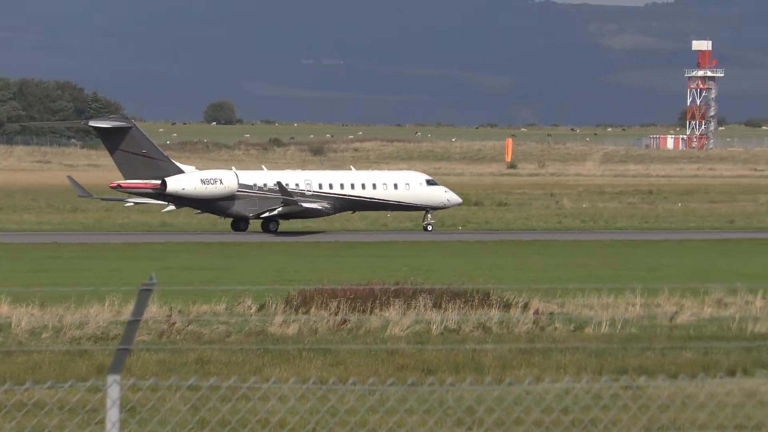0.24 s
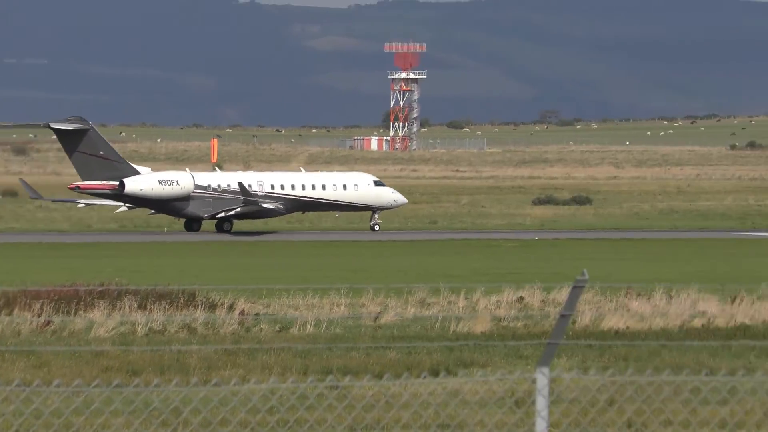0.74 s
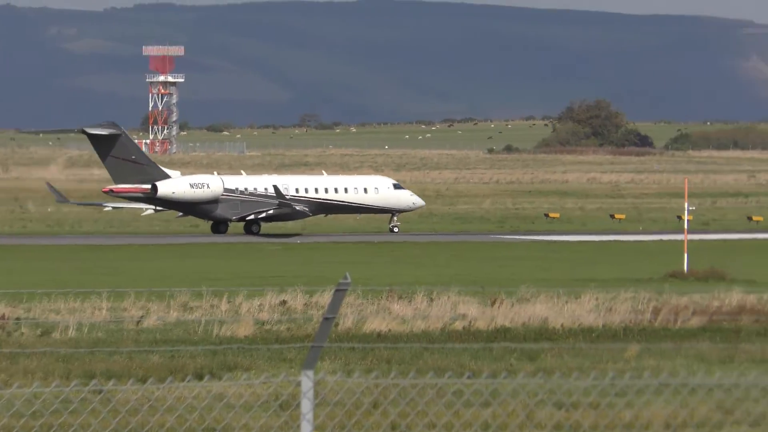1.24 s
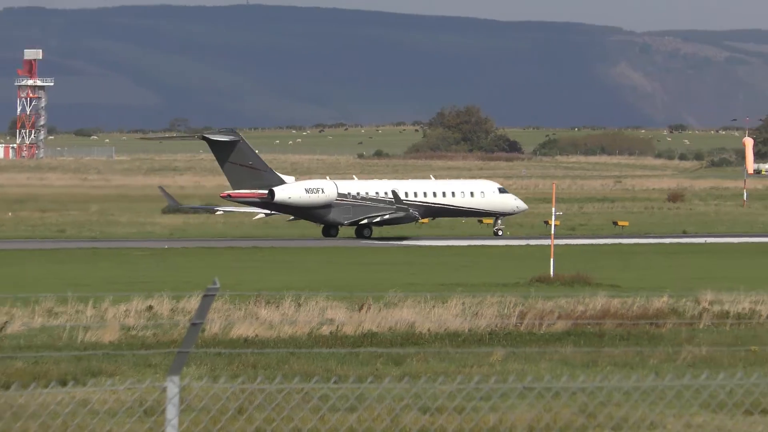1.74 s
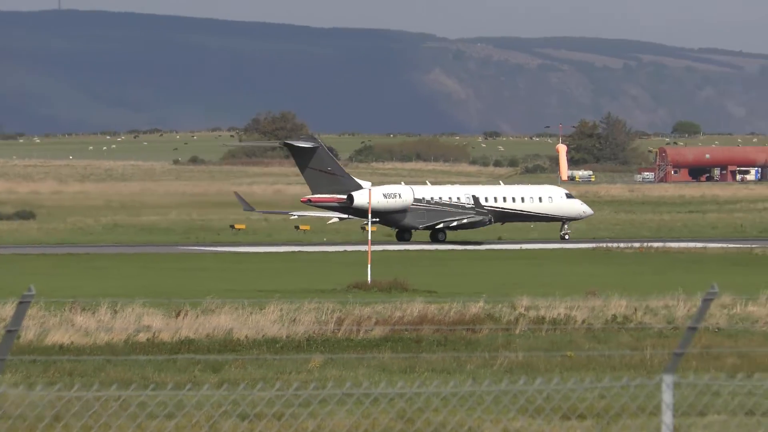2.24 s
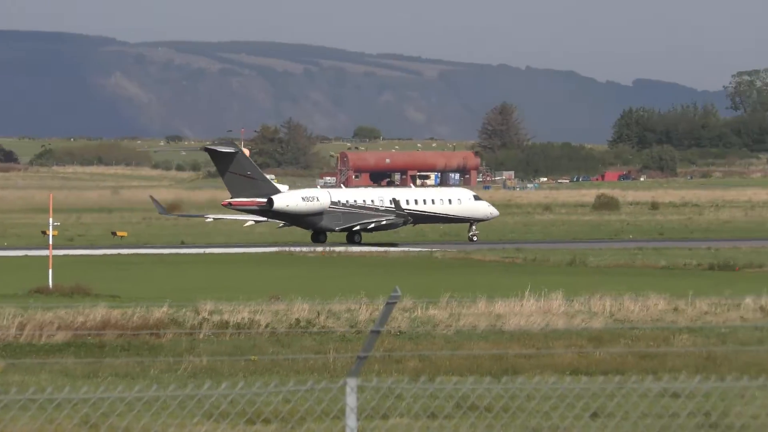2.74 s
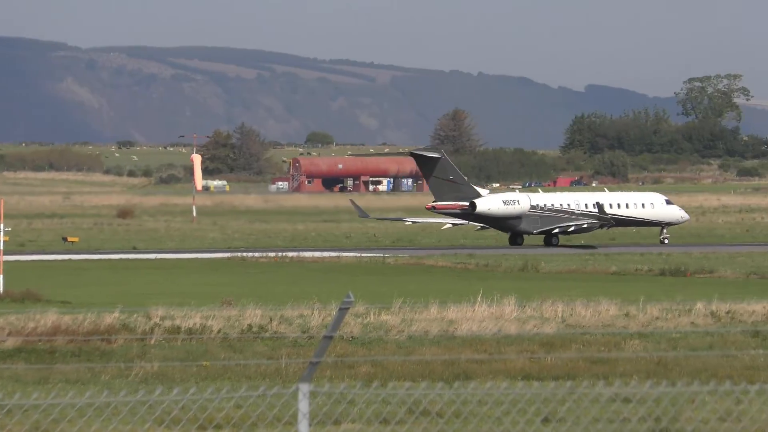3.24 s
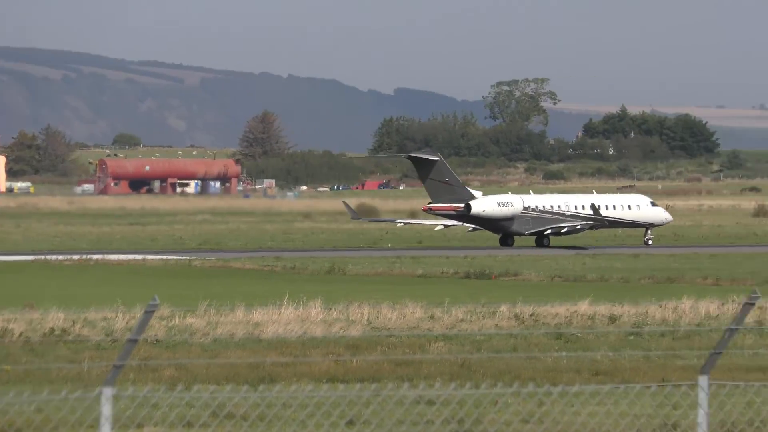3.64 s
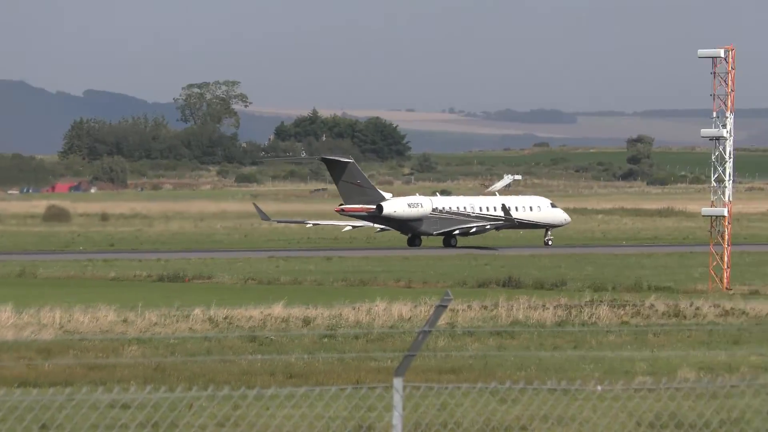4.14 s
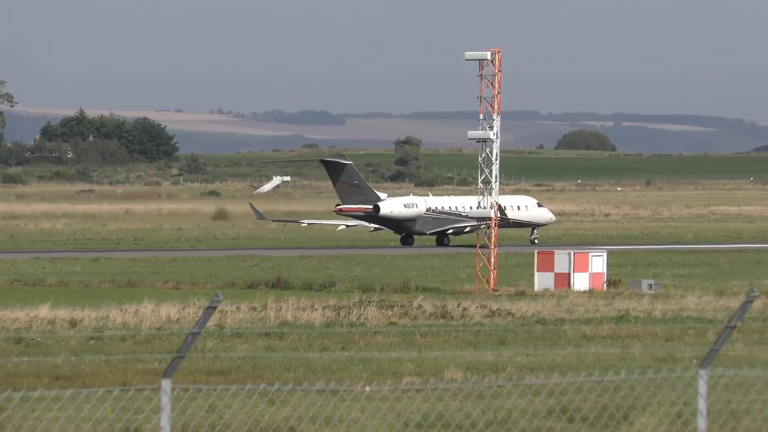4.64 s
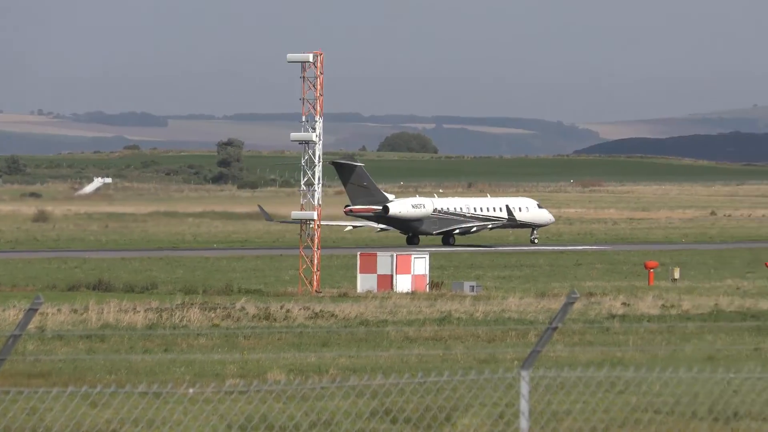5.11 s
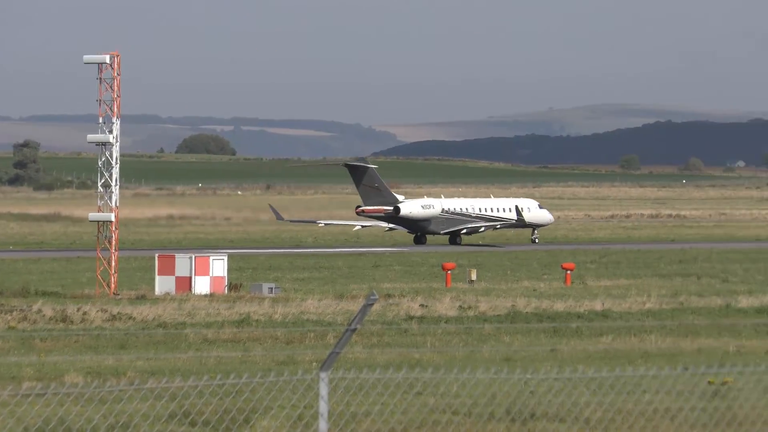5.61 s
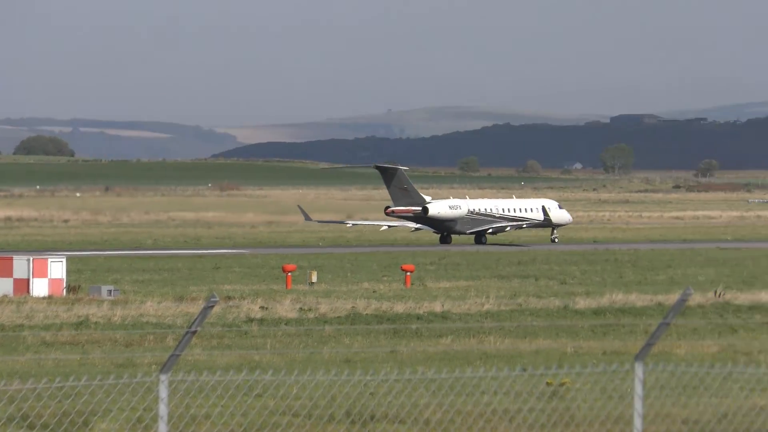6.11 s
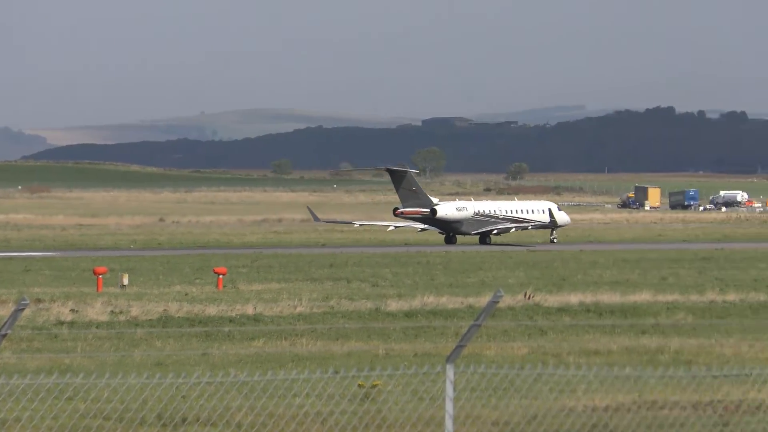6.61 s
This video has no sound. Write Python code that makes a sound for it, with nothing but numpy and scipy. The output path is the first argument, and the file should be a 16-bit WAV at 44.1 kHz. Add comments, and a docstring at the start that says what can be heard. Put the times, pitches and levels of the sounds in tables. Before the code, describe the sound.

A steady, dull jet roar heard from far across an open airfield, mono. The opening is strong and a bit crunchy from overload; around two seconds it falls back, then surges near three and again more weakly past five and a half. A faint high whine slowly sinks and disappears into the rush, while deep wind buffeting becomes more noticeable toward the end.

```python
"""Exhaust roar, fan rush and a thin whine swell and fade on the wind, over a low rumble.
They come from a twin-engine business jet on a runway, dulled by a wide stretch of grass.
Roar, rush and rumble are random noise shaped by frequency; the whine is one wavering tone.
The loudest stretches overload the input, and gusts on the microphone add a low flutter."""
import sys
import numpy as np
from scipy import signal
from scipy.fft import rfft, irfft, next_fast_len
from scipy.io import wavfile
from scipy.ndimage import uniform_filter1d

SR = 44100
rng = np.random.default_rng(int(sys.argv[2]) if len(sys.argv) > 2 else 0)


def unload_wav(signal):
    """Save mono or channel-first audio to the path in sys.argv[1] as 16-bit WAV at rate SR, clipped to [-1, 1]."""
    wavfile.write(
        sys.argv[1],
        SR,
        np.round(np.clip(np.atleast_2d(signal).T, -1, 1) * 32767).astype(np.int16),
    )


N = 302526
TIME = np.arange(N) / SR  # seconds
FREQS = np.maximum(np.arange(N // 2 + 1) * SR / N, 1)  # Hz, kept above zero for the logarithm


def engines(shimmer_hz=6, shimmer_db=0.6):
    """Exhaust mixing and fan noise; eddies along the path make the higher parts shimmer."""
    # Tone colour of each noise: (frequency [Hz], relative level [dB per Hz])
    rumble_spectrum = [(60, -26.5), (130, -12.5), (180, -14.5), (260, -6), (380, -1), (480, -2.5),
                       (620, -6), (1000, -32)]
    roar_spectrum = [(280, -31.5), (420, -11), (560, -4), (820, 0.5), (1100, -0.5), (1420, 0), (1700, -2),
                     (2100, -20.5), (3000, -42.5)]
    fan_spectrum = [(1000, -25.5), (1450, -7), (1800, -0.5), (2200, 2), (2600, 1.5), (2800, -2.5),
                    (3100, -10.5), (3400, -12.5), (3650, -17), (4600, -21.5), (5500, -29.5), (6700, -42),
                    (8500, -55.5), (12000, -76.5)]
    # Loudness of the low rumble: (time [s], level [dB])
    rumble_level = [(0, -26.5), (1.25, -21.5), (1.8, -25.5), (2.35, -22.5), (2.9, -27), (3.6, -24),
                    (4.2, -28.5), (4.6, -26.5), (5.05, -30.5), (6.86, -30.5)]

    rumble_db, = in_time(rumble_level)
    roar_db, fan_db = engine_levels()
    rumble = from_db(rumble_db) * turbulence(rumble_spectrum)
    roar = from_db(roar_db) * turbulence(roar_spectrum)
    fan = from_db(fan_db) * turbulence(fan_spectrum)
    # roar and fan shimmer independently
    roar = roar * from_db(shimmer_db * drift(shimmer_hz))
    fan = fan * from_db(shimmer_db * drift(shimmer_hz))
    return rumble + roar + fan


def engine_levels():
    """Roar and fan rush in dB: both fade as the jet rolls away and ride swells on the wind."""
    # Swells and lulls carried by the wind:
    # (time [s], half length [s], exhaust roar change [dB], fan rush change [dB])
    swells = [(0.12, 0.089, 0, 3.5), (0.492, 0.12, 2, 4.5), (1.086, 0.12, 3.5, -3), (1.368, 0.2, 4, 4),
              (1.85, 0.091, 2.5, 1.5), (2.564, 0.088, 0.5, 6), (2.726, 0.14, -5.5, 0.5),
              (3.137, 0.35, 4.5, 7), (3.78, 0.17, -3.5, -3), (4.118, 0.17, -2, 1.5), (4.62, 0.21, 2, 3.5),
              (5.613, .18, 9, 7.5), (5.993, .11, -0.5, 4), (6.403, .15, 0.5, -3)]
    roar_start_db, roar_fade_db_per_s = -21.5, 0.6
    fan_start_db, fan_fade_db_per_s = -23, 0.37
    # both begin louder, hold, then drop away
    extra_db, hold_s, release_s = 9.5, 1.57, 0.65

    loud_db = extra_db * np.clip(1 - (TIME - hold_s) / release_s, 0, 1)
    roar_db = roar_start_db - roar_fade_db_per_s * TIME + loud_db
    fan_db = fan_start_db - fan_fade_db_per_s * TIME + loud_db
    for s, length, roar_change_db, fan_change_db in swells:
        shape = swell(s, length)
        roar_db = roar_db + roar_change_db * shape
        fan_db = fan_db + fan_change_db * shape
    return roar_db, fan_db


def whine():
    """The fan blade tone sinks as the jet goes by; moving air blurs its pitch and level."""
    start_hz, sag_hz_per_s = 2587, 24
    under_fan_db, fade_db_per_s = 10, 1.3  # starts this far below the fan rush, then sinks further
    _, fan_db = engine_levels()
    level_db = fan_db - under_fan_db - fade_db_per_s * TIME
    pitch_hz = start_hz - sag_hz_per_s * TIME
    waver_hz = 8 * drift(rate_hz=25)
    flicker_db = 3.5 * drift(rate_hz=14)
    # adding up the pitch, sample by sample, gives the phase of the tone
    phase = 2 * np.pi * np.cumsum(pitch_hz + waver_hz) / SR
    tone = rms_one(np.sin(phase) * from_db(flicker_db))
    return from_db(level_db) * tone


def over_grass(x):
    """Direct and ground-reflected sound interfere: bass comes and goes, hollows colour the roar."""
    # Boost or cut of the bass: (time [s], level [dB])
    bass_level = [(0, 1), (1.3, -3), (1.9, -2.5), (3.5, 0), (4.3, 10.5), (5.2, 3.5), (5.7, -4), (6.1, -3),
                  (6.7, 9.5)]
    # Bands hollowed out for a moment: (time [s], centre frequency [Hz], level change [dB])
    hollows = [(3.05, 606, -5.5), (3.8, 1310, -2), (4.27, 560, -7), (4.55, 1140, -7), (5.7, 254, -11),
               (6.35, 825, -5), (6.75, 666, -4)]
    bass_hz, bass_octaves = 190, 0.47
    hollow_s, hollow_octaves = 0.29, 0.33  # half length and half width

    bass_db, = in_time(bass_level)
    # adding a band times (gain - 1) raises or lowers just that band
    out = x + band(x, bass_hz, bass_octaves) * (from_db(bass_db) - 1)
    for s, hz, db in hollows:
        gain = from_db(db * swell(s, hollow_s))
        out = out + band(x, hz, hollow_octaves) * (gain - 1)
    return out


def wind(steadiness=0.76):
    """Eddies buffet the microphone; the wind freshens steadily, with gusts and lulls."""
    # Tone colour of the buffeting: (frequency [Hz], relative level [dB per Hz])
    buffet_spectrum = [(12, -38), (24, -8.5), (36, -7), (48, -2.5), (62, -1.5), (78, -1.5), (92, -11),
                       (110, -20), (160, -30), (240, -17.5), (400, -40), (800, -81)]
    # Gusts and lulls: (time [s], half length [s], level change [dB])
    gusts = [(2.337, .35, -1), (4.252, 0.35, 6), (4.433, 0.021, 5), (5.356, 0.12, 8), (5.823, 0.12, -3),
             (6.01, 0.067, 1), (6.7, 0.18, 2.5)]
    start_db, rise_db_per_s = -31.5, 1.38

    level_db = start_db + rise_db_per_s * TIME
    for s, length, db in gusts:
        level_db = level_db + db * swell(s, length)
    eddies = turbulence(buffet_spectrum)
    # even out most of the random swings in strength, using a window of 1/7 s
    strength = np.sqrt(uniform_filter1d(eddies ** 2, size=SR // 7))
    return from_db(level_db) * rms_one(eddies / strength ** steadiness)


def turbulence(spectrum):
    """Random pressure, as from churning air, with the given spectrum and unit power."""
    hz, db = np.transpose(spectrum)
    gain = from_db(np.interp(np.log(FREQS), np.log(hz), db))
    gain = gain / (1 + (FREQS / hz[-1]) ** 4)  # fade out above the last listed frequency
    return rms_one(shaped(rng.standard_normal(N), gain))


def drift(rate_hz):
    """Random wandering of spread 1: straight lines between random points, two per 1 / rate_hz."""
    steps = rng.standard_normal(int(N / SR * rate_hz * 2) + 2)
    return rms_one(np.interp(TIME * rate_hz * 2, np.arange(len(steps)), steps))


def swell(s, length):
    """A smooth rise and fall around a moment."""
    return bell((TIME - s) / length)


def bell(x):
    """Smooth bump of height 1 around zero."""
    return np.exp(-x ** 2)


def band(x, hz, octaves):
    """The part of a sound around one frequency."""
    size = next_fast_len(N + SR // 10)  # silence at the end keeps it from wrapping to the start
    freqs = np.maximum(np.fft.rfftfreq(size, 1 / SR), 1)
    gain = bell(np.log2(freqs / hz) / octaves)
    return irfft(rfft(x, size) * gain, size)[:N]


def shaped(x, gain):
    """Filter by a gain at each frequency."""
    return irfft(rfft(x) * gain, N)


def in_time(rows):
    """Each column of a curve, at every sample."""
    s, *columns = np.transpose(rows)
    return [np.interp(TIME, s, column) for column in columns]


def from_db(db):
    """Decibels to gain."""
    return 10 ** (np.asarray(db) / 20)


def rms_one(x):
    """Scale to unit power."""
    return x / np.sqrt(np.mean(x ** 2) + 1e-20)


def gain_control(x, knee_db=-14.0, lift=0.39, release_db_per_s=6):
    """Quiet stretches are slowly lifted; a loud swell pulls the gain straight back."""
    power = uniform_filter1d(x ** 2, size=SR // 14)
    level_db = 10 * np.log10(np.maximum(power, 1e-12))
    # follow each peak at once, then let go at a steady rate
    release_db = release_db_per_s * TIME
    held_db = np.maximum.accumulate(level_db + release_db, axis=-1) - release_db
    return x * from_db(lift * np.maximum(knee_db - held_db, 0))


def scene():
    """The distant jet, heard across the grass, as one channel."""
    return over_grass(engines() + whine())[None]


def record(dry, treble_hz=17000, overload_db=-7.5, cutoff_hz=15760):
    """The input cuts the loudest peaks flat, gain control follows, wind flutter rides on top."""
    top = from_db(overload_db)
    clipped = np.clip(dry, -top, top)
    # gentle treble loss
    pole = np.exp(-2 * np.pi * treble_hz / SR)
    softened = signal.lfilter([1 - pole], [1, -pole], clipped)
    heard = gain_control(softened) + wind()
    # steep cut of everything above the cutoff
    steep_cut = signal.ellip(14, 0.1, 80, cutoff_hz, fs=SR, output="sos")
    return signal.sosfilt(steep_cut, heard)


dry = scene()
out = record(dry)
unload_wav(out)
```